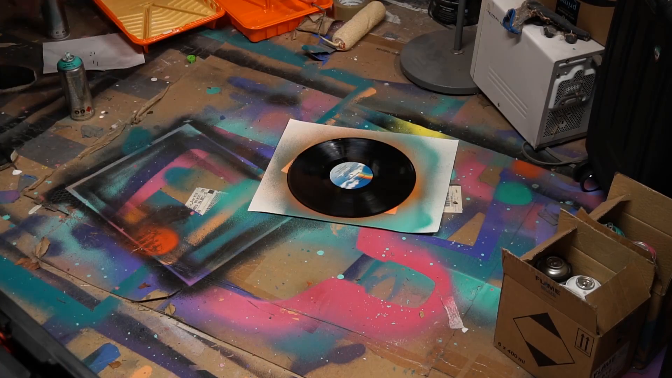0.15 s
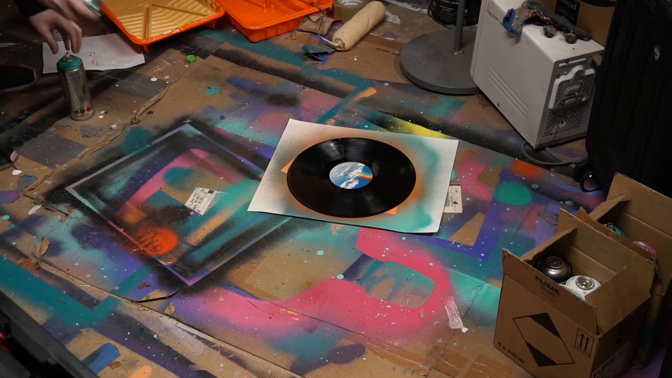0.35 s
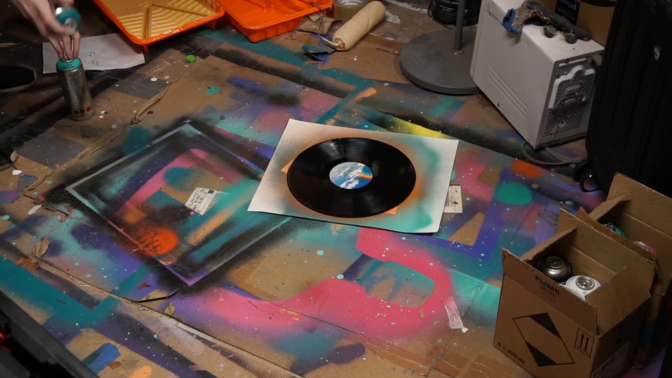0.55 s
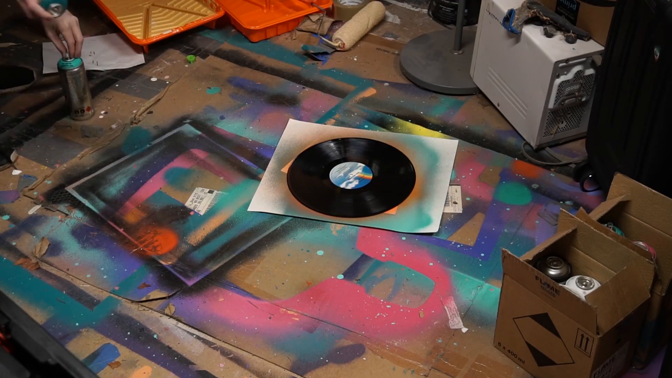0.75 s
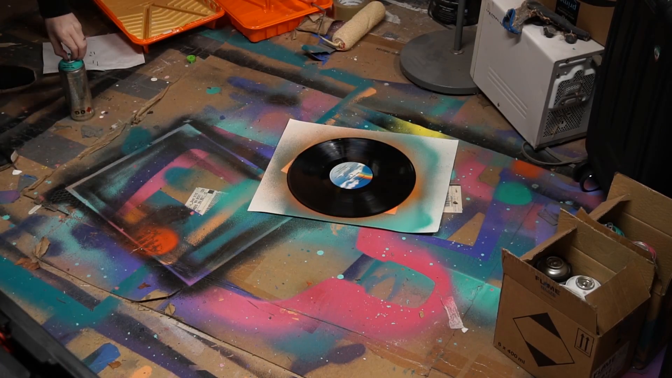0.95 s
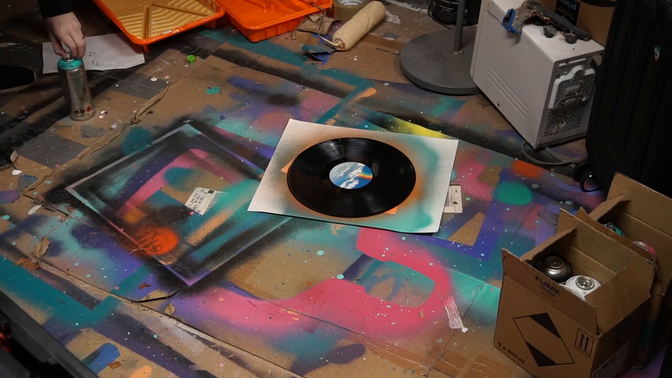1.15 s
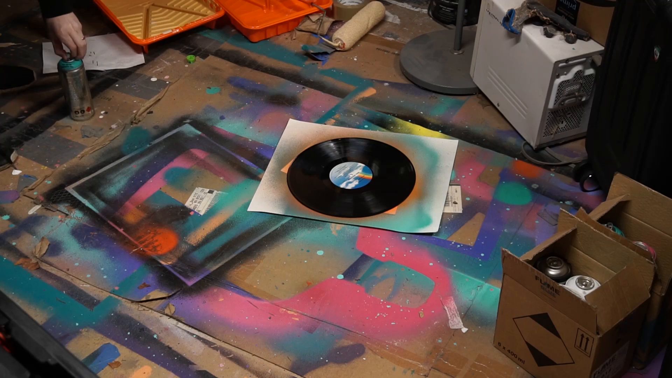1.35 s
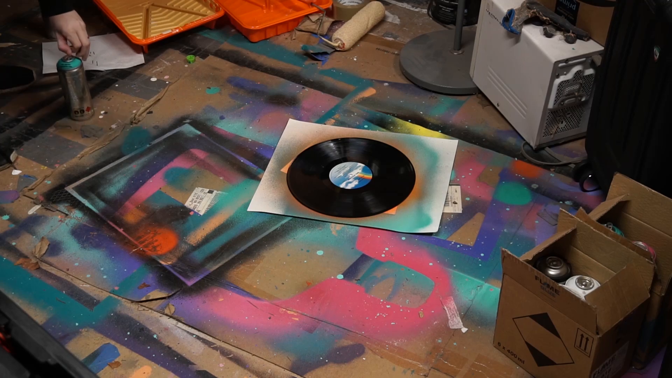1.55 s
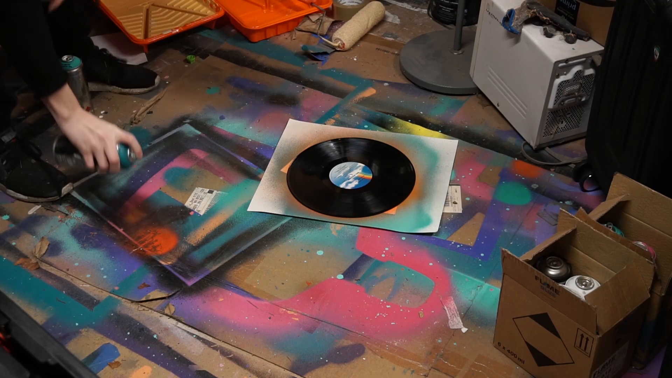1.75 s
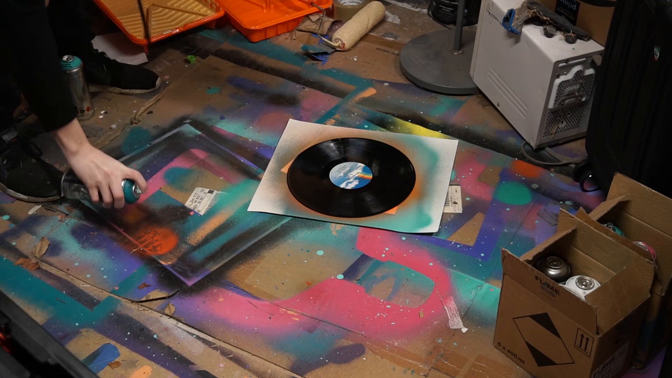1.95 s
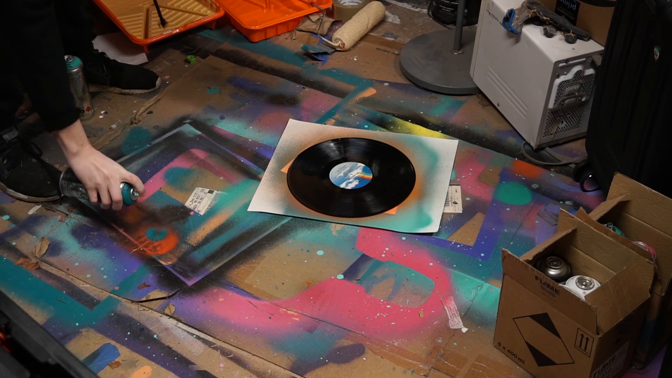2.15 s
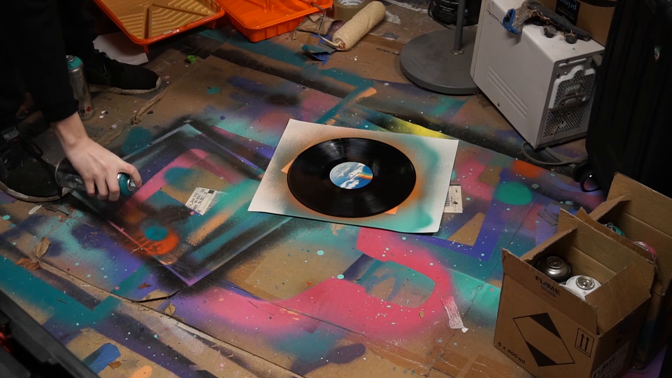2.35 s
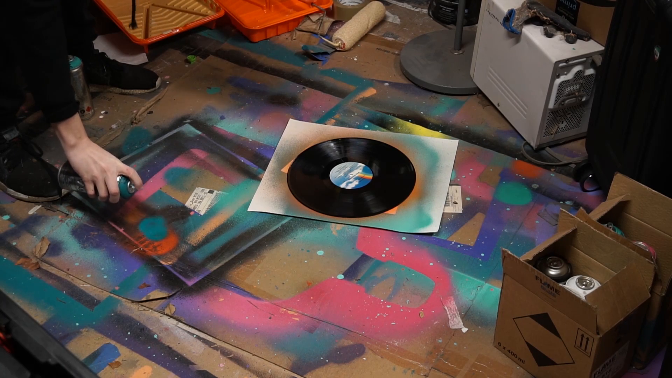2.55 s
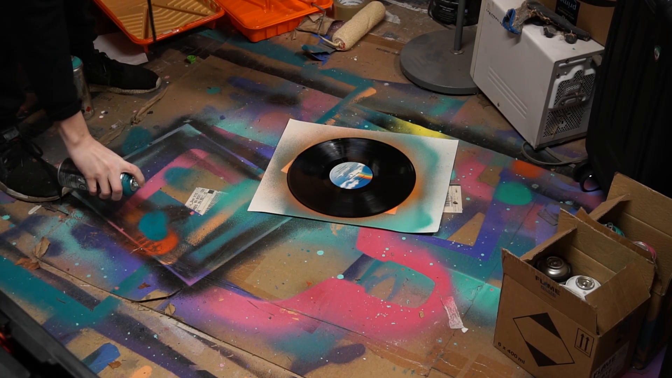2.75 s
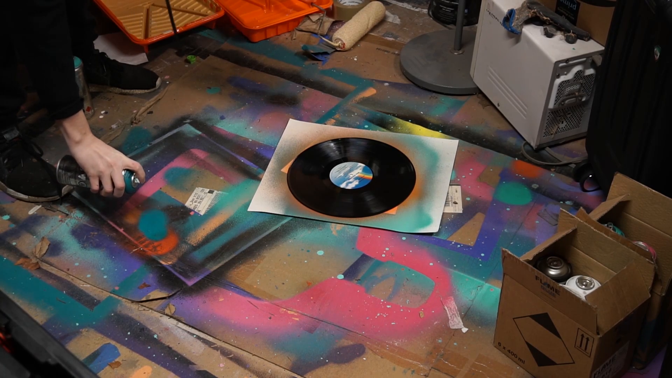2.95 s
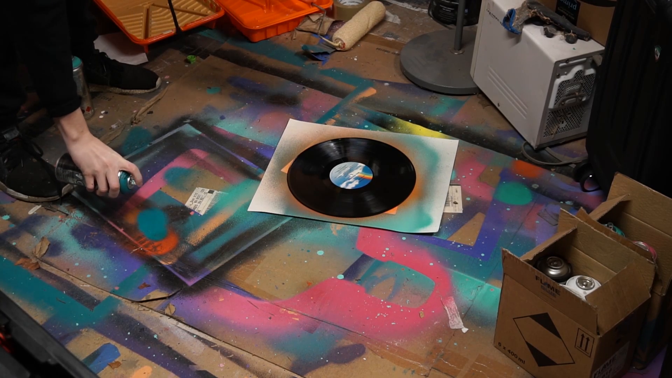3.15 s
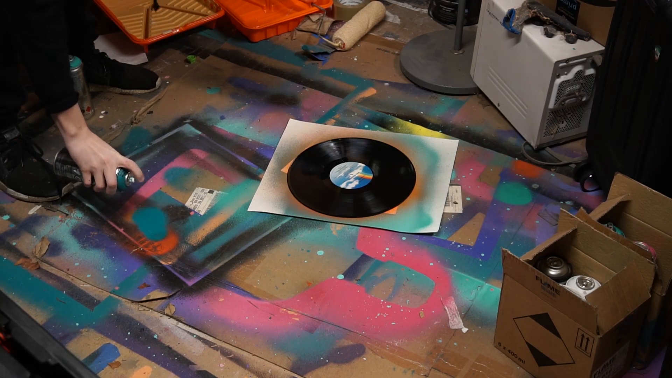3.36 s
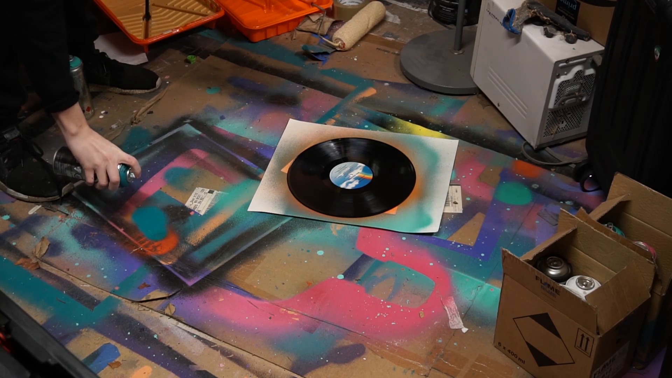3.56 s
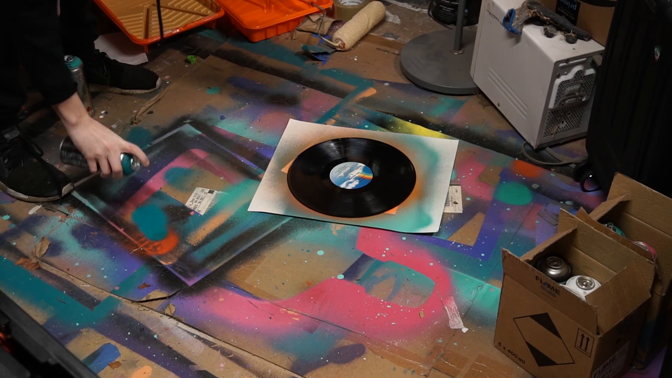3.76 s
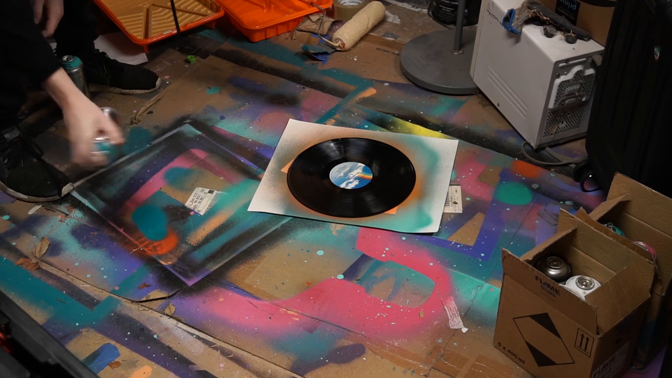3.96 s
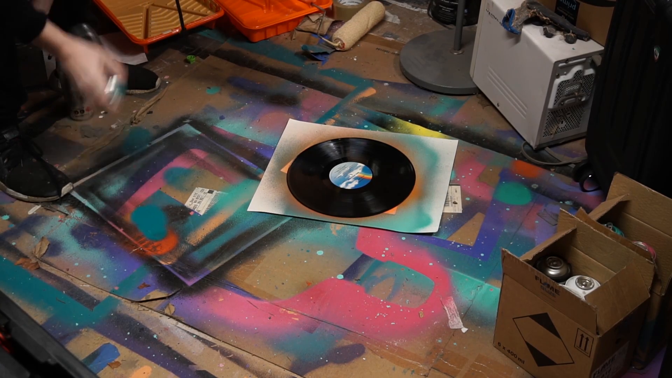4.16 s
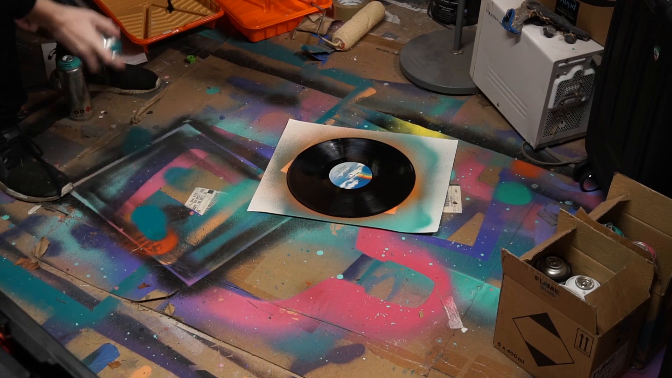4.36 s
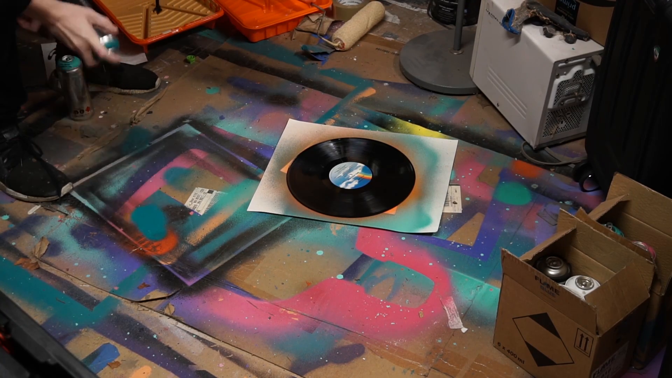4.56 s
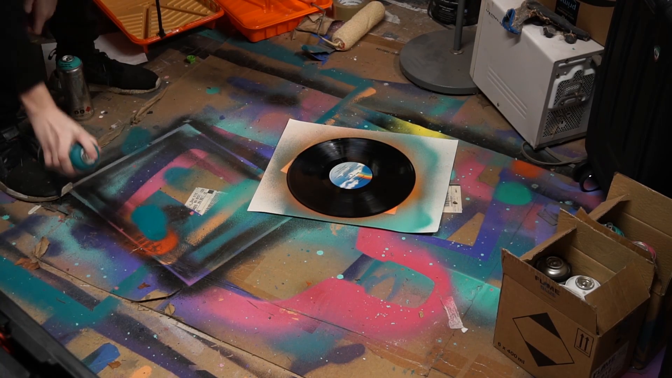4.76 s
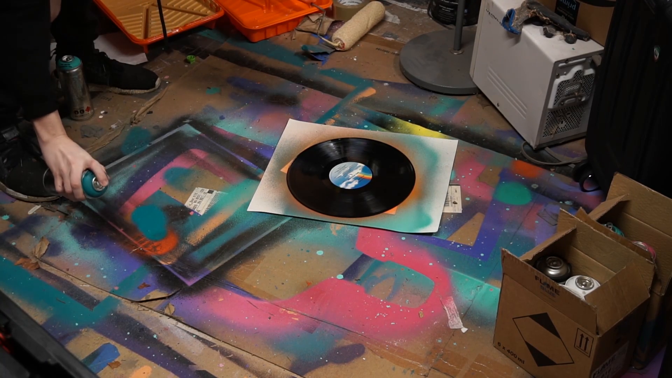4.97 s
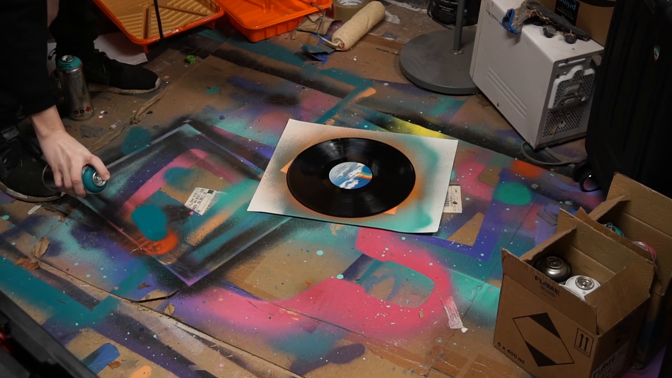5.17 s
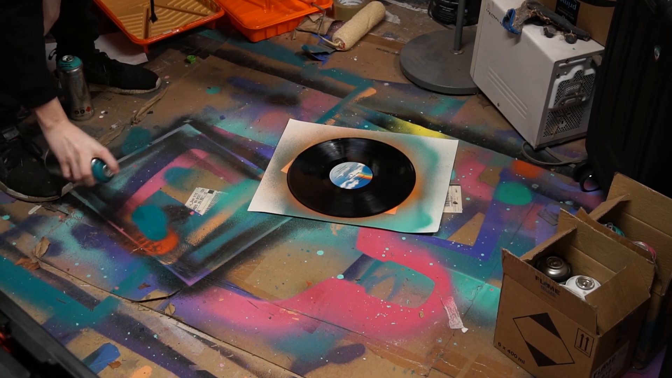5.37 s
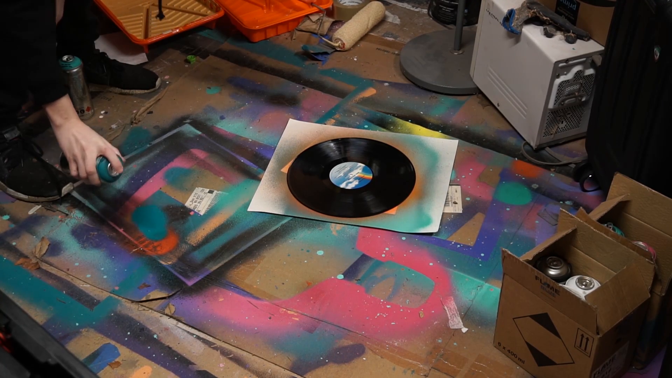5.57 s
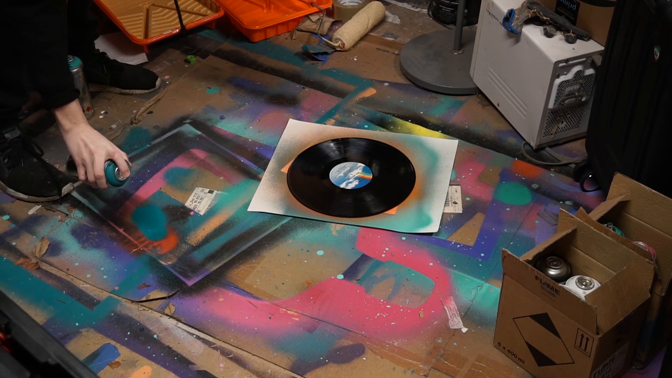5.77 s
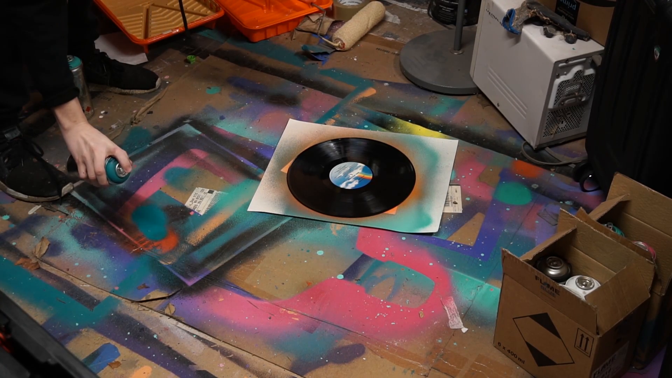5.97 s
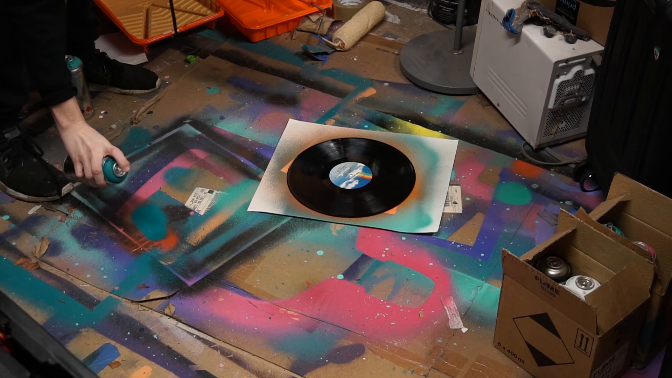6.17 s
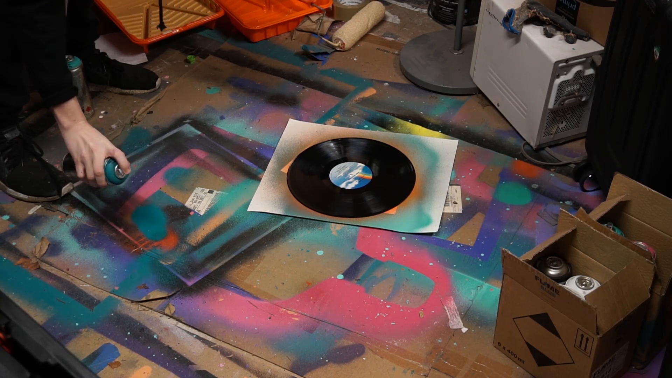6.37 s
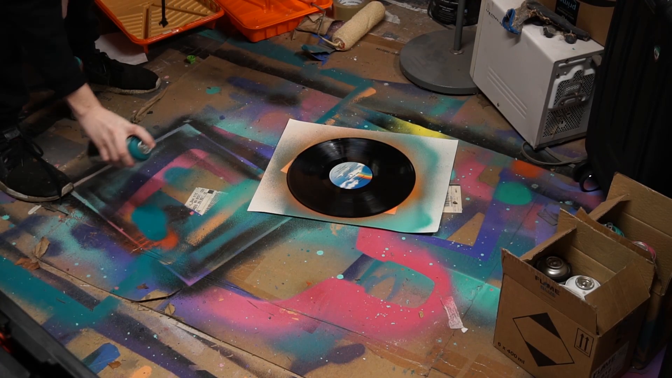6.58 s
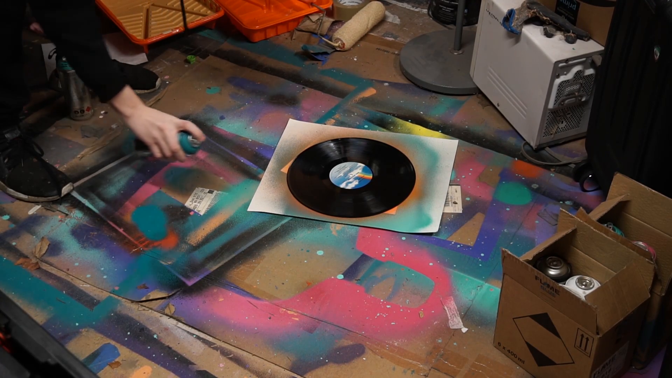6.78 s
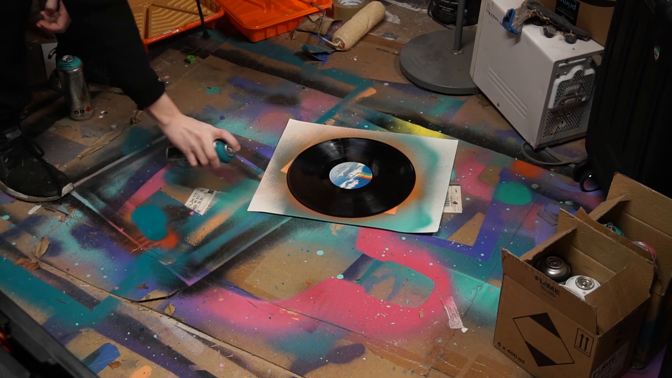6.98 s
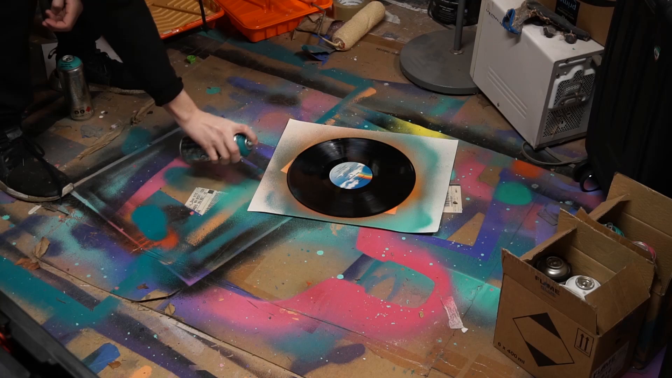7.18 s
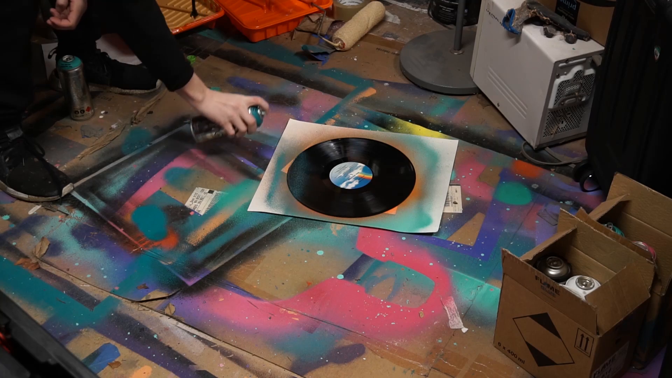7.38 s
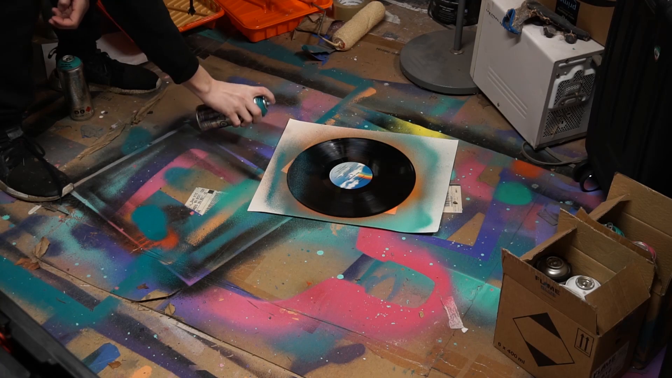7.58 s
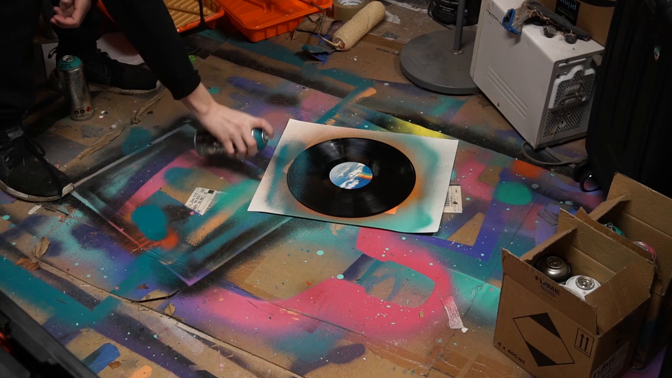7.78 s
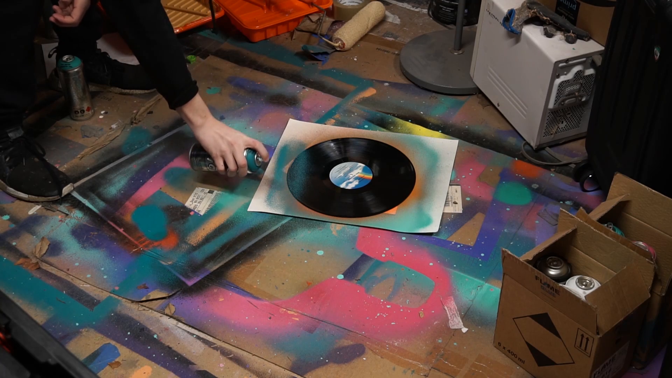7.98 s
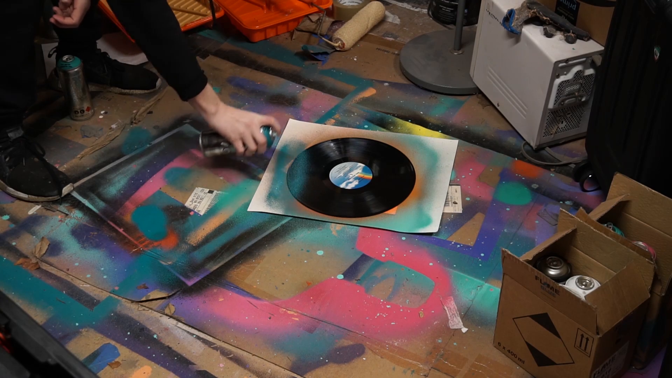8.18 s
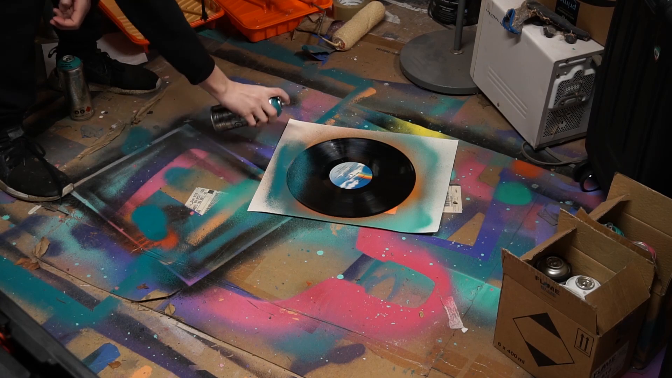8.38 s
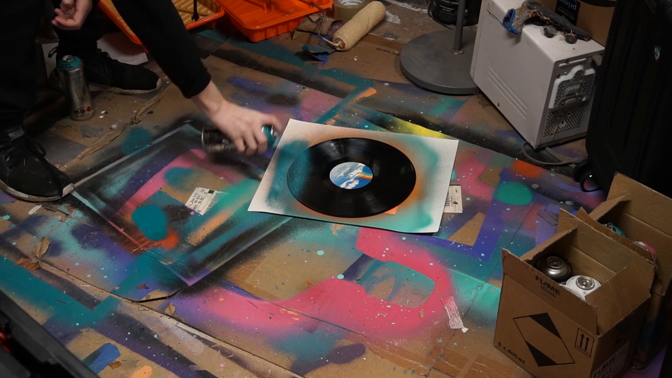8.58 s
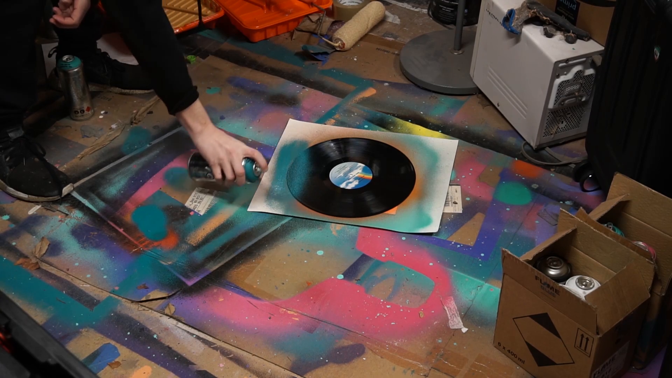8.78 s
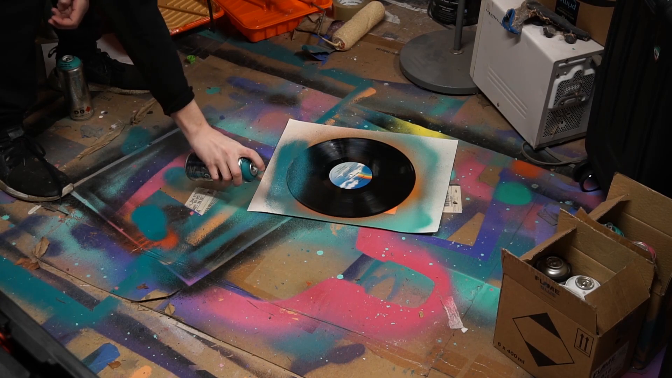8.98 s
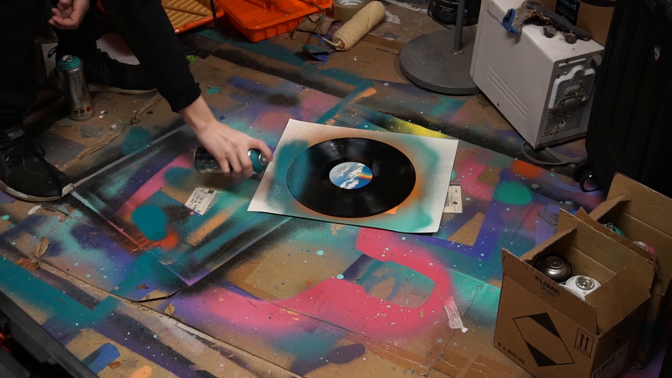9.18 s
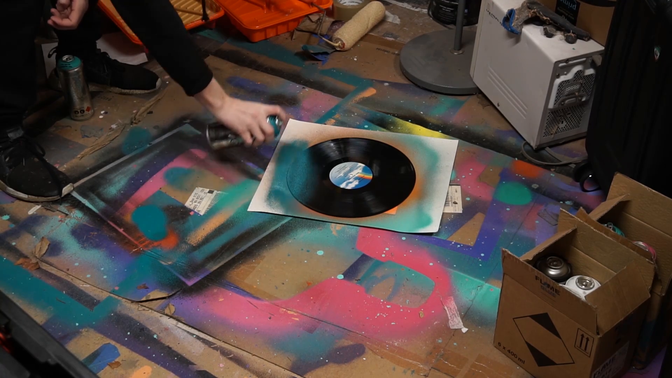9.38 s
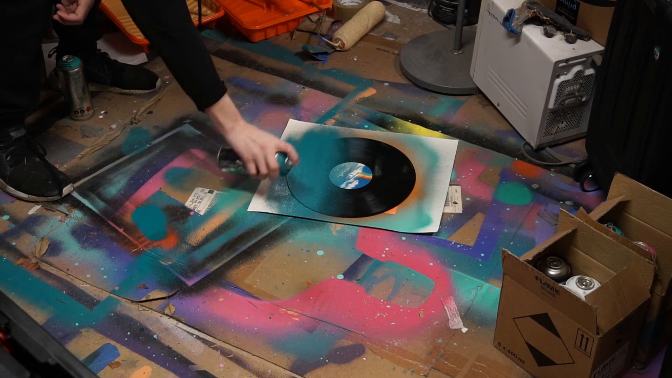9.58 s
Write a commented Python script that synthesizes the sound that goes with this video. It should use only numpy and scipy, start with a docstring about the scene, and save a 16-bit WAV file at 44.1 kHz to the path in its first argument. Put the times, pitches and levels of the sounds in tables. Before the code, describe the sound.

A sleeve rustles and a tin clinks lightly twice, then a paint can is shaken vigorously, its mixing ball cracking and clacking irregularly until an abrupt cut. Seven short aerosol puffs follow with a shoe scuff and faint squeak. The can is shaken again, then more puffs come, moving slightly rightward, with one floor knock. Close stereo microphone in a bare, ringing studio over low room rumble.

```python
"""A sleeve slides and a tin clinks twice; then its mixing ball cracks against both ends and skitters, until a sudden break.
A hum and a drone set in over the room's rumble; a sole scuffs and squeaks among puffs of turbulent hiss from a nozzle.
The floor, a few centimetres away, reflects each puff and colours it as the hand moves; the ball is shaken once more.
More puffs move to the right, with a knock on the floor; the last one drops suddenly.
A bare studio rings throughout; gain control ducks the background under each shaking and lets it creep back."""
import sys
import numpy as np
from scipy import signal
from scipy.fft import rfft, irfft
from scipy.io import wavfile
from scipy.ndimage import uniform_filter1d, minimum_filter1d

SR = 44100
rng = np.random.default_rng(int(sys.argv[2]) if len(sys.argv) > 2 else 0)


def persist_wave(psi):
    """Save psi, clipped to +-1, as 16-bit WAV."""
    counts = np.round(np.clip(psi, -1, 1) * 32767).astype(np.int16)
    wavfile.write(sys.argv[1], SR, np.atleast_2d(counts).T)


N = 424683
T = np.arange(N) / SR
# the first shaking breaks off here; hum and drone set in
BREAK_S = 1.741
LEFT_RIGHT = np.array([[1], [-1]])

# Modes of the tin. Each row: frequency in Hz, relative level in dB, t60 in seconds.
TIN_MODES = [(1966, -7, 0.26), (4180, 5.5, 0.072), (7500, -7, 0.2), (7380, 1.5, 0.21), (9400, 0, 0.088),
             (9335, -19, 0.16), (10700, 5, 0.079), (11860, -24, 0.15)]
# Colour of a sliding sleeve, also of the tick of a tap. Each row: frequency in Hz, level in dB.
SLEEVE_COLOUR = [(200, -32), (700, -16), (1200, -12.5), (2100, 1), (5000, 2), (8000, 0.5), (12500, 1.5),
                 (16000, -10)]


def amp(db):
    """Decibels to gain."""
    return 10 ** (np.asarray(db) / 20)


def unit(x):
    """Scale to rms 1."""
    return x / np.sqrt(np.mean(x ** 2))


def along(points, hz):
    """Read (Hz, value) points on a log-frequency axis."""
    f, value = np.transpose(points)
    return np.interp(np.log(np.maximum(hz, 1)), np.log(f), value)


def causal(gain):
    """Minimum-phase frequency response with the given gains, by folding the cepstrum."""
    cepstrum = irfft(np.log(gain))
    half = len(cepstrum) // 2
    cepstrum[1:half] *= 2
    cepstrum[half + 1:] = 0
    return np.exp(rfft(cepstrum))


def colour(x, points, size=1024):
    """Filter with the given (Hz, dB) shape; white noise keeps its power."""
    gain = amp(along(points, np.fft.rfftfreq(size, 1 / SR)))
    response = irfft(causal(gain))
    return signal.fftconvolve(x, response / np.linalg.norm(response))[:len(x)]


def add(track, s, x):
    """Mix x into the track at time s."""
    i = int(s * SR)
    track[..., i:i + x.shape[-1]] += x[..., :N - i]


def walk(rate_hz, size=N):
    """Smooth random drift with a spread near 1."""
    k = max(int(SR / rate_hz), 1)
    steps = np.repeat(rng.standard_normal(size // k + 1), k)
    return uniform_filter1d(steps, k)[:size]


def fade(t, t60_s):
    """Decay by 60 dB in t60_s."""
    return amp(-60 * t / t60_s)


def ball(wet_db=3.0, wet_db_per_db=0.1):
    """The ball strikes base, dome and side wall; at each stroke it bounces in ever shorter, weaker hops."""
    # Strokes of the ball. Each row: start in seconds, force in dB, place from 0 = bright base # through about
    # 0.75 = hollow dome to 1 = a graze along the side wall, time to the first rebound in seconds.
    strokes = [(.415, 0.5, 0.38, 0.0094), (0.4766, -5.5, 1, 0.017), (0.5295, 2.5, 0.77, 0.014),
               (0.6152, 1.5, 0.14, 0.027), (0.7248, -7.5, 1, 0.0082), (0.7978, -4.5, 0.95, 0.0052),
               (0.874, 1.5, 0.34, 0.032), (1.0241, -0.5, 0.82, 0.026), (1.1217, -2.5, 0.083, 0.034),
               (1.1784, -6, 0.18, .027), (1.2209, -8.5, 0.73, 0.007), (1.2861, 0, 0.85, 0.013),
               (1.3882, 0.5, .1, 0.017), (1.4828, -7.5, 0.66, 0.0044), (1.5487, -2, 0.92, 0.0051),
               (1.6796, -0.5, .1, 0.027), (1.8775, -33.5, 1, 0.013), (2.2795, -35.5, 0.78, 0.0049),
               (4.0114, -12.5, 0.76, 0.025), (4.118, 0, 0.44, 0.0098), (4.1787, -6, 1, .016),
               (4.2072, -1, 0.85, 0.014), (4.3134, -12, 1, 0.0082), (4.337, 4.5, 0.43, .01),
               (4.4424, 1.5, 0.79, .017), (4.5443, -1, 0.1, 0.025), (4.6839, -1.5, .75, 0.0037),
               (4.7604, -15, 1, 0.021), (5.217, -18.5, 0.8, .006), (5.3343, -31.5, .75, 0.0038),
               (5.4268, -20.5, 0.73, 0.0076)]
    # First contact and rebounds. Each entry: level in dB.
    contact_levels = [0, -2, -14]
    restitution = .62  # each hop takes this share of the time of the last
    out = np.zeros((2, N))
    for s, force_db, place, rebound_s in strokes:
        can = np.zeros(SR)
        for k, contact_db in enumerate(contact_levels):
            delay_s = rebound_s * np.sum(restitution ** np.arange(k))
            add(can, delay_s, amp(contact_db) * blow(force_db, place))
        wet = studio(can, wet_db + wet_db_per_db * force_db)
        add(out, s, until_break(wet, s))
    return out


def until_break(x, s):
    """A sound that starts at s in the first shaking ends where that breaks off."""
    return x[:, :int((BREAK_S - s) * SR)] if s < BREAK_S else x


def blow(force_db, place, spot_db=1.5):
    """One hit of the ball: from base through dome to wall the crack fades and the clack grows; harder hits
    skitter more."""
    # Colour of the bright crack. Each row: frequency in Hz, level in dB.
    crack_colour = [(200, -48.5), (700, -21.5), (1500, -13), (3200, -6.5), (4500, 0.5), (5700, 1.5),
                    (8000, -2.5), (9500, -4), (11500, -5.5), (14000, -10.5), (16000, -11.5)]
    # Colour of the hollow clack. Each row: frequency in Hz, level in dB.
    clack_colour = [(150, -52), (350, -18.5), (700, -9), (1300, -4.5), (1950, 1.5), (3100, -1.5),
                    (5100, 1.5), (6300, -8.5), (7800, -7.5), (9200, -33), (12300, -4.5), (16000, -26)]
    bright_db = 21.5 - 12 * place ** 2
    hollow_db = 3.0 + 14.5 * place
    hop_db = -10 + 0.76 * force_db
    crack = amp(bright_db) * contact(ring_s=0.0012, skitter_db=hop_db, skitter_s=0.041)
    clack = amp(hollow_db) * contact(ring_s=0.0015, skitter_db=hop_db, skitter_s=0.0081)
    # the lowest mode rings too, its pitch drawn anew per blow for where the paint lies
    body_hz = TIN_MODES[0][0] * (1 + .04 * rng.standard_normal())
    body_db = hollow_db - 32 - 0.27 * force_db
    can = amp(body_db) * ring(body_hz, t60_s=0.07, waver_hz=303)
    # each spot on the tin favours other frequencies
    for burst, shape in ((crack, crack_colour), (clack, clack_colour)):
        spot = [(hz, db + spot_db * rng.standard_normal()) for hz, db in shape]
        add(can, 0, colour(burst, spot))
    return amp(force_db) * can


def contact(ring_s, skitter_db, skitter_s, scatter_db=4, size=8192):
    """One contact: a short, damped noise burst, repeated by smaller scattered hops that die away."""
    t = T[:size]
    hop_now = rng.random(size) < 600 / SR  # 600 hops per second on average
    hop_level = amp(skitter_db + scatter_db * rng.uniform(-2.8, 1, size))
    hops = hop_now * hop_level * np.exp(-t / skitter_s)
    hops[0] = 1
    burst = rng.standard_normal(size) * np.exp(-t / ring_s)
    spectrum = rfft(hops) * rfft(burst)
    # a hard contact feeds all frequencies evenly
    smooth_gain = np.sqrt(uniform_filter1d(np.abs(spectrum) ** 2, size=32))
    return irfft(spectrum / causal(smooth_gain))


def ring(hz, t60_s, waver_hz, size=16384):
    """A fading mode of the tin; the paint sloshing inside makes its pitch waver."""
    phase = 2 * np.pi * np.cumsum(hz + waver_hz * walk(400, size)) / SR
    return fade(T[:size], t60_s) * np.sin(phase)


def spray():
    """Turbulent hiss of the nozzle plus its reflection off the floor; the valve snaps open and eases shut."""
    # Puffs. Each row: valve opens in seconds, closes in seconds, level in dB before trim,
    # swell in the middle in dB, nozzle height at mid-puff in cm.
    puffs = [(1.727, 1.917, -36, 1, 5.4), (2.076, 2.301, -37.5, -0.5, 6.5), (2.396, 2.589, -35.5, -2, 6.4),
             (2.676, 2.867, -36, -1, 6.05), (2.976, 3.15, -35.5, -1.5, 5.9), (3.253, 3.429, -34.5, -3, 6),
             (3.553, 3.722, -35.5, -1, 6.1), (4.977, 5.212, -32.5, 4.5, 10.3), (5.723, 5.917, -34, -1, 5.6),
             (6.057, 6.232, -35.5, 2.5, 7.1), (6.334, 6.519, -37, 5.5, 7.15), (7.159, 7.479, -37, 2, 7.4),
             (7.684, 7.929, -36, -0.5, 6.2), (8.102, 8.351, -35, -1.5, 6.1),
             (8.531, 8.763, -35.5, -2, 6.05), (9.264, 9.518, -39.5, 1.5, 6.4)]
    # Colour of the jet before the low cut. Each row: frequency in Hz, level in dB.
    jet_colour = [(300, -52), (900, -21), (1500, -20), (2100, -12), (3200, -12), (4500, -4), (5900, -10.5),
                  (7700, -5), (9100, -9.5), (10500, -4), (12700, -0.5), (14300, -2), (16000, -2)]
    open_s, close_s, trim_db = 0.0096, 0.031, -1.07
    spit_db, shut_db, spit_s = 3.5, 1, 0.037  # the jet spits at opening and at shutting
    flutter_db, sputter_db = 1.2, 1.0
    sink_cm_per_s, tremble_cm, sound_cm_per_s = 2.4, 0.43, 34300
    reflection = .33  # share of the hiss that the floor throws back
    low_cut = [(hz, db - 2 * (hz < 6500)) for hz, db in jet_colour]
    out = np.zeros(N)
    for on_s, off_s, level_db, swell_db, mid_height_cm in puffs:
        length_s = off_s - on_s
        t = T[:int((length_s + .2) * SR)]
        jet = colour(rng.standard_normal(len(t)), low_cut)
        # the hand sinks and trembles: the comb of the reflection slides through the hiss
        height_cm = mid_height_cm - sink_cm_per_s * (t - length_s / 2) + tremble_cm * walk(12.5, len(t))
        lag_s = 2 * height_cm / sound_cm_per_s
        # oversampled for fractional delays
        fine = signal.resample_poly(jet, 4, 1)
        fine_t = np.linspace(0, len(t) / SR, len(fine), endpoint=False)
        jet = jet + reflection * np.interp(t - lag_s, fine_t, fine)
        opening = 1 - np.exp(-t / open_s)
        closing = np.exp(-(np.maximum(t - length_s, 0) / close_s) ** 2)
        db = level_db + trim_db + swell_db * np.sin(np.pi * np.minimum(t / length_s, 1))
        db = db + spit_db * np.exp(-t / spit_s) + shut_db * np.exp(-np.abs(t - length_s) / spit_s)
        db = db + flutter_db * walk(44.2, len(t)) + sputter_db * walk(900, len(t))
        add(out, on_s, jet * opening * closing * amp(db))
    return out


def clinks(ring_db=-11, tick_db=23):
    """A light tap leaves the wall of the tin free to ring."""
    # Light taps. Each row: start in seconds, level in dB before the ring and tick offsets.
    taps = [(.250, -20.5), (.271, -24.5)]
    out = np.zeros(N)
    for s, db in taps:
        for hz, mode_db, t60_s in TIN_MODES:
            add(out, s, amp(db + ring_db + mode_db) * ring(hz, t60_s, waver_hz=134))
        tick = contact(ring_s=0.0096, skitter_db=-11.5, skitter_s=0.012)
        add(out, s, amp(db + tick_db) * colour(tick, SLEEVE_COLOUR))
    return out


def handling(sleeve_db=-44, squeak_db=-41.5, scuff_db=-18, knock_db=-10):
    """A sleeve slides as the can is lifted (noise), a sole scuffs (bursts) and squeaks (sine), the floor knocks."""
    # Colour of a scuffing sole. Each row: frequency in Hz, level in dB.
    sole_colour = [(100, -21), (300, -7), (550, -2.5), (900, -1), (1500, -10), (4000, -24)]
    # Colour of a knock on the floor. Each row: frequency in Hz, level in dB.
    knock_colour = [(100, -18), (250, -6.5), (390, 3), (600, -11), (1300, -11.5), (2000, -9), (3500, -13),
                    (9000, -39)]
    slide_db = np.interp(T, [0, .06, .12, .2, .37, .45], [-16, -1, -1.5, -10, 2.0, -74])
    out = colour(rng.standard_normal(N), SLEEVE_COLOUR) * amp(sleeve_db + slide_db)

    t = T[:int(.085 * SR)]
    squeak_hz = np.interp(t, [0, .035, .08], [490, 630, 580]) * (1 + 0.11 * walk(400, len(t)))
    squeak = np.sin(2 * np.pi * np.cumsum(squeak_hz) / SR) * fade(t, 0.23)
    add(out, 2.002, amp(squeak_db) * squeak)
    for s in (1.756, 2.002):
        scuff = contact(ring_s=0.017, skitter_db=-14, skitter_s=0.079)
        add(out, s, amp(scuff_db) * colour(scuff, sole_colour))

    knock = contact(ring_s=0.022, skitter_db=-25.0, skitter_s=0.035)
    add(out, 7.428, amp(knock_db) * colour(knock, knock_colour))
    return out


def room_tone(air_db=-59, side_db=-0.7, hum_trim_db=0.5, hum_hz=171, drone_hz=110):
    """Steady rumble and faint hiss (coloured noise), a wavering sine hum and a low drone of narrow noise."""
    # Colour of the room's air. Each row: frequency in Hz, level in dB.
    air_colour = [(15, -40), (25, -8), (133, -11.5), (169, -8.5), (198, -16), (246, -11.5), (267, -20.5),
                  (340, -10.5), (445, -25), (482, -20.5), (582, -23.5), (1170, -21), (1450, -26.5),
                  (15500, -33.5)]
    # The hum swells and sinks. Each row: time in seconds, level in dB before trim.
    hum_levels = [(1.8, -66.5), (3.1, -55.5), (3.69, -75), (3.77, -68), (4.38, -78), (7.51, -74),
                  (7.95, -57.5), (8.84, -67.5), (8.93, -57.5), (9.6, -68)]
    # The drone comes and goes. Each row: time in seconds, level in dB.
    drone_levels = [(1.74, -63.5), (2.4, -57), (3.3, -68.5), (4, -70)]
    mid, side = (colour(rng.standard_normal(N), air_colour, size=8192) for _ in range(2))
    # long waves reach both channels alike
    side = colour(side, [(30, -26.5), (120, -17), (500, -1.5), (4000, -2.5)], size=4096)
    air = (mid + amp(side_db) * side * LEFT_RIGHT) * amp(air_db)

    hum_db = hum_trim_db + np.interp(T, *np.transpose(hum_levels)) + 2 * walk(10)
    hum = np.sin(2 * np.pi * np.cumsum(hum_hz + 4 * walk(21)) / SR) * amp(hum_db)

    drone_colour = [(drone_hz / 2, -18), (drone_hz, 0), (drone_hz * 2, -9), (1000, -22), (4000, -60)]
    drone = colour(rng.standard_normal(N), drone_colour, size=8192)
    drone = drone * amp(np.interp(T, *np.transpose(drone_levels)))
    return air + (hum + drone) * (T > BREAK_S)


def studio(x, wet_db, early_db=3, size=24576):
    """Direct sound plus decaying noise echoes per band; the channels differ more towards the treble."""
    # Reverberation of the room. Each row: band centre in Hz, t60 in seconds.
    decays = [(200, 0.32), (800, 0.64), (2000, 0.47), (5500, 0.38), (10000, 0.28), (16000, 0.19)]
    t, hz = T[:size], np.fft.rfftfreq(size, 1 / SR)
    # the first echoes off floor and furniture are few and strong
    sparse = np.exp(-t / .018)
    spikes = np.exp(sparse * rng.standard_normal(size) - sparse ** 2)
    echoes = rng.standard_normal((2, size)) * spikes * amp(early_db * sparse)
    spectrum, tail = rfft(echoes), 0
    for centre_hz, t60_s in decays:
        band = along([(f, f == centre_hz) for f, _ in decays], hz)
        mid, side = irfft(spectrum * band) * fade(t, t60_s)
        width = amp(along([(800, -10.5), (2000, -5.5), (5500, 0.0), (12000, 2)], centre_hz))
        tail = tail + np.array([mid + width * side, mid - width * side]) / np.hypot(1, width)
    onset = np.clip(t / 0.0014, 0, 1)
    response = amp(wet_db) * unit(tail * onset) / np.sqrt(size)
    response[:, 0] += 1  # direct sound
    return signal.fftconvolve(x[None], response, axes=1)[:, :N]


def gain_control(x, threshold_db=-27, squeeze=0.62, recover_db_per_s=12):
    """Take a share of the excess off loud sound within milliseconds, then creep back up; the background ducks."""
    size = int(.008 * SR)
    power = uniform_filter1d(np.mean(x ** 2, axis=0), size)
    level_db = 10 * np.log10(np.maximum(power, 1e-12))
    wanted_db = squeeze * np.maximum(level_db - threshold_db, 0)
    recovery_db = recover_db_per_s * T[:x.shape[1]]
    # running maximum against a ramp: the cut shrinks at the recovery rate
    cut_db = np.maximum.accumulate(wanted_db + recovery_db) - recovery_db
    return x * amp(-uniform_filter1d(cut_db, size // 2))


def scene(stop_s=9.516, stop_db=-10):
    """All sources in the one room; the hiss drops suddenly at stop_s."""
    # the spraying hand works its way from left to right
    lean_db = np.interp(T, [6.3, 7.2], [.5, -1.3])
    hiss = studio(spray(), wet_db=0.0) * amp(LEFT_RIGHT * lean_db / 2)
    hiss = hiss * amp(stop_db * (T > stop_s))
    return ball() + hiss + studio(clinks() + handling(), wet_db=-1.5) + room_tone()


def record(dry, ceiling=.75, top_hz=15850):
    """Gain control, starting afresh at the break; a fast limiter holds down the hardest blows; the top is cut."""
    parts = np.split(dry, [int(BREAK_S * SR)], axis=1)
    even = np.hstack([gain_control(part) for part in parts])
    size = int(.001 * SR)
    gain = ceiling / np.maximum(np.abs(even).max(axis=0), ceiling)
    held = even * uniform_filter1d(minimum_filter1d(gain, size), size)
    low_pass = signal.ellip(10, .2, 70, top_hz, fs=SR, output="sos")
    return signal.sosfilt(low_pass, held)


dry = scene()
out = record(dry)
persist_wave(out)
```